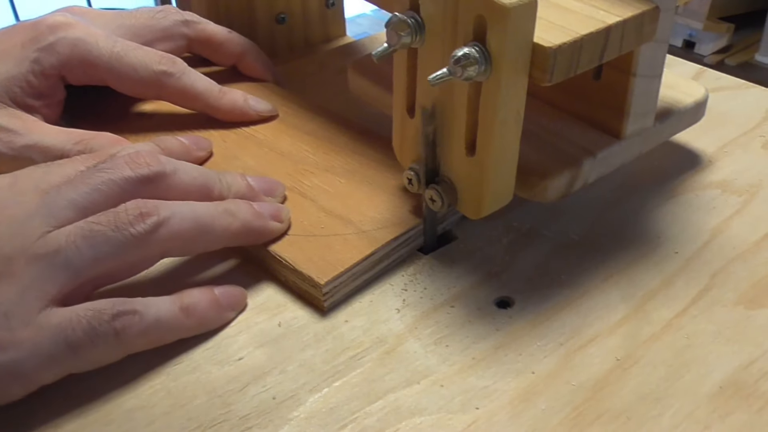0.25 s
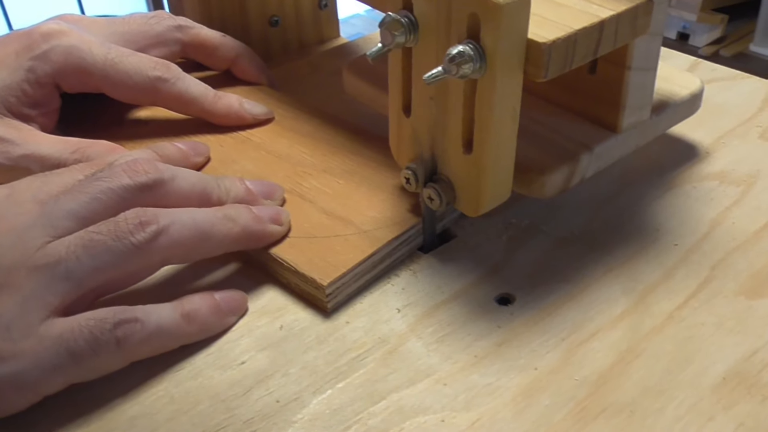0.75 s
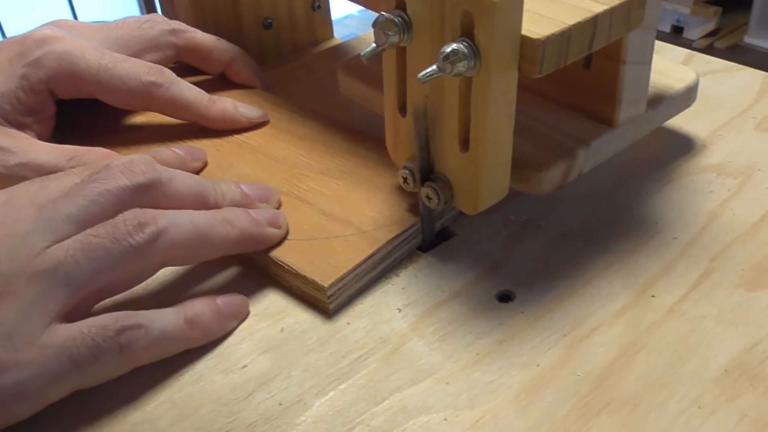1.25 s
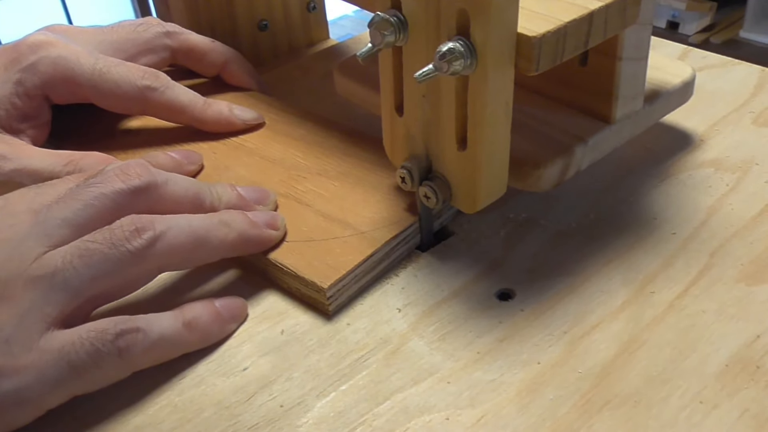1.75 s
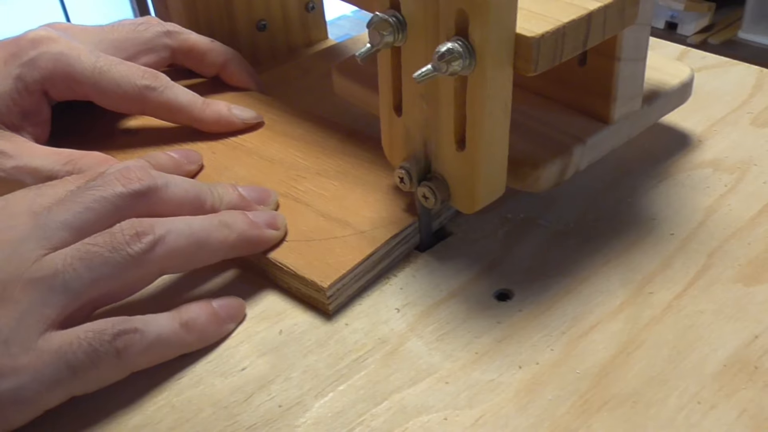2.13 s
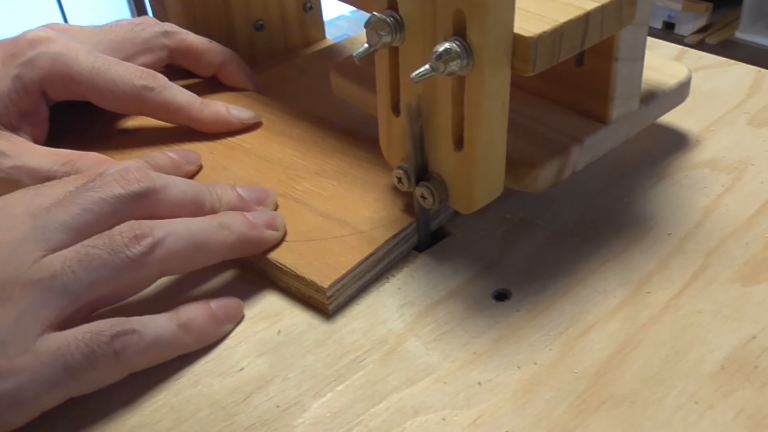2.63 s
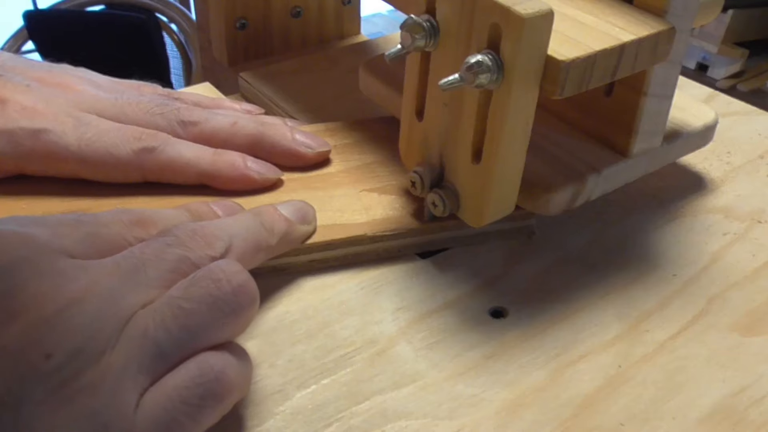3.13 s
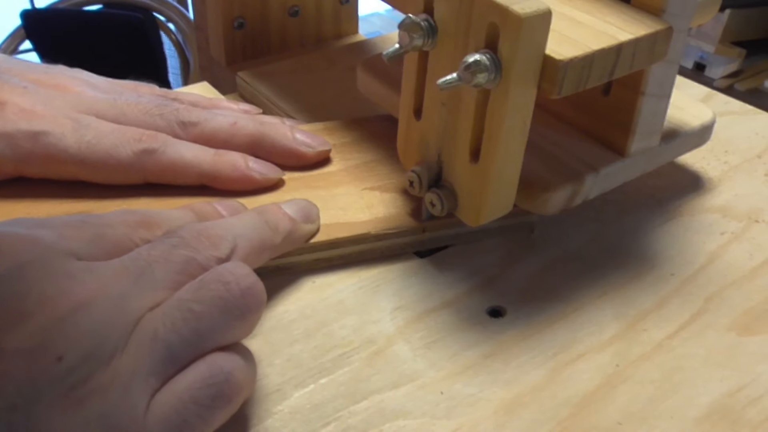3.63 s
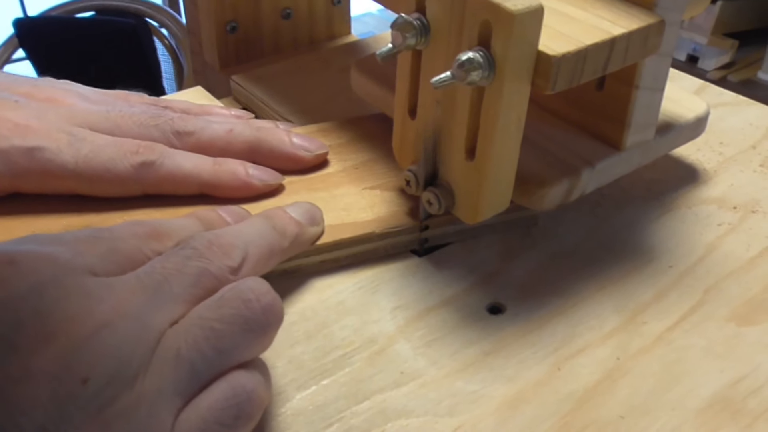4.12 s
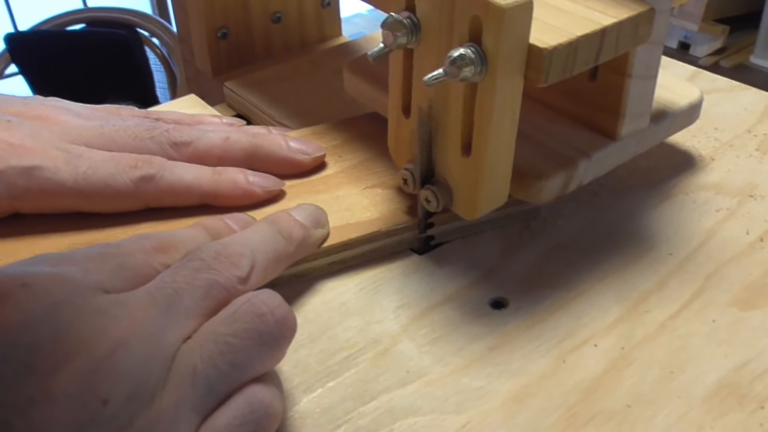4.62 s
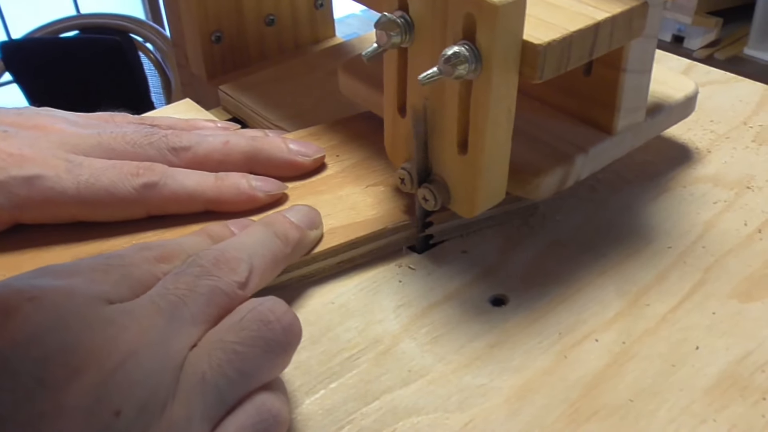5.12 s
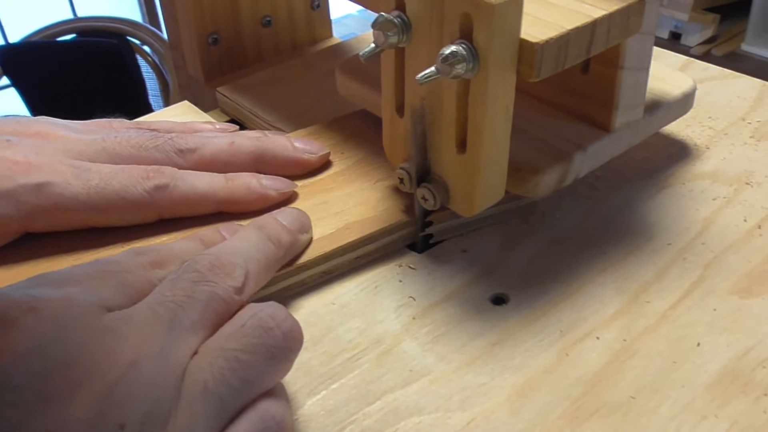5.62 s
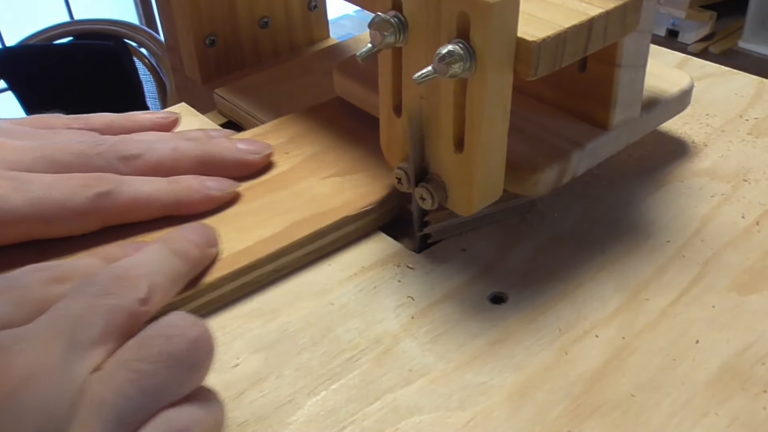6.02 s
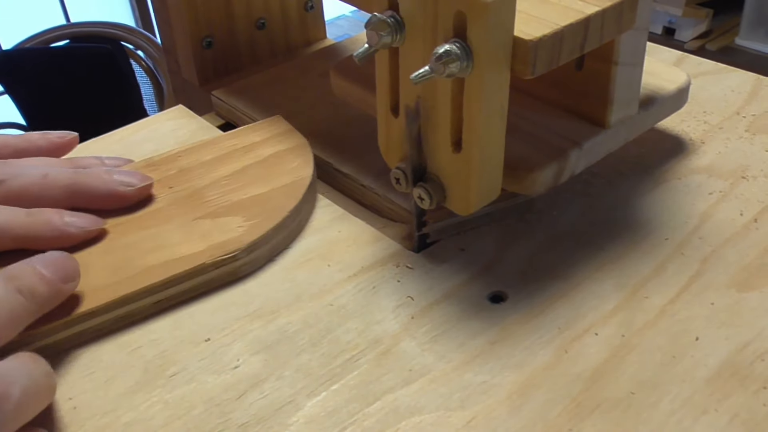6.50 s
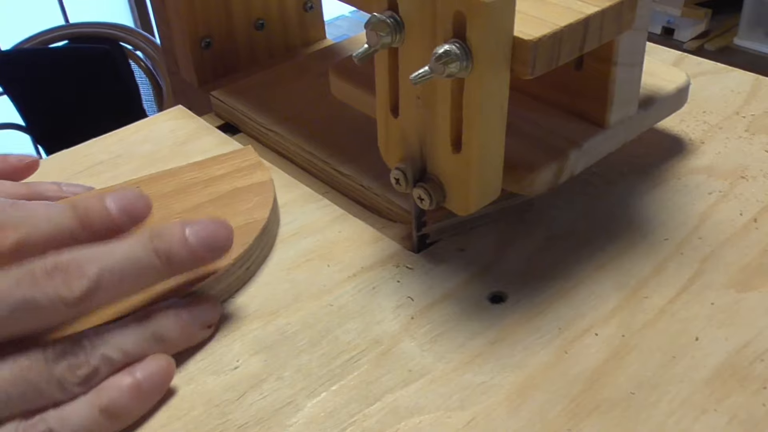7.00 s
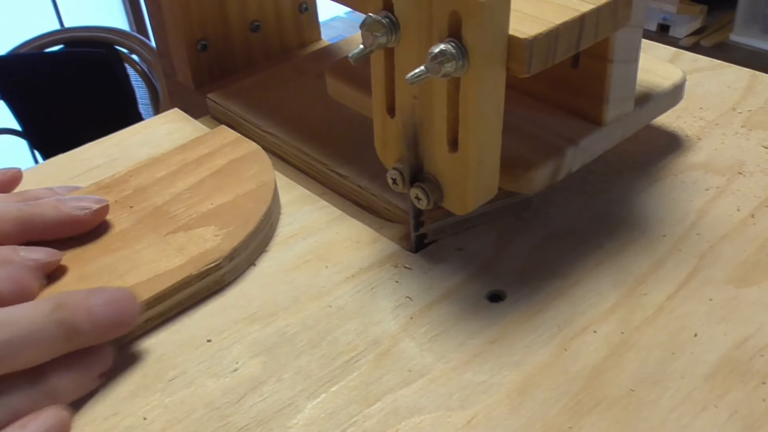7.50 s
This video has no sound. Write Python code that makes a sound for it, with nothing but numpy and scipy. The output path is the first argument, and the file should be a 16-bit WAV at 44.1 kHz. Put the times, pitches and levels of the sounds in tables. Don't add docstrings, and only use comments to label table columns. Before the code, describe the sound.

A jigsaw under a plywood table chatters steadily, jumps abruptly to a sped-up higher buzz, then drops back to the slower, looser rattle.

```python
import sys
import numpy as np
from scipy import signal
from scipy.fft import rfft, irfft
from scipy.io import wavfile
from scipy.ndimage import uniform_filter1d

SR = 44100
rng = np.random.default_rng(int(sys.argv[2]) if len(sys.argv) > 2 else 0)


def transcribe(signal):
    frames = np.atleast_2d(signal).T
    limited = np.clip(frames, -1, 1)
    pcm = np.round(limited * 32767).astype(np.int16)
    wavfile.write(sys.argv[1], SR, pcm)


def gain_from_db(level_db):
    decades = np.asarray(level_db, float) / 20
    return 10 ** decades


N = 341775


def ring(x, hz, width_hz):
    f = np.maximum(np.arange(x.shape[-1] // 2 + 1) * SR / x.shape[-1], 1)
    response = 1 / (1 + 1j * (f * f - hz * hz) / (f * width_hz)) ** 2
    y = irfft(rfft(x) * response, x.shape[-1])
    return y / np.sqrt(np.mean(y ** 2, axis=-1, keepdims=True))


def stereo(mid, side, side_gain):
    return mid + side_gain * side * np.array([[1], [-1]])


def random_swell(n, per_s, spread_db):
    k = max(int(SR / per_s), 2)
    steps = np.repeat(rng.standard_normal(n // k + 1), k)
    return spread_db * uniform_filter1d(steps, k)[:n]


RUMBLE_DB = [
    -83,
    -91.5,
    -79,
]
# t/s, peak/dB, loss either side/(dB/s)
BUMPS = [
    (0.0, -76, 130),
    (0.73, -91, 45),
    (1.92, -64, 45),
    (3.06, -73, 222),
    (5.2, -75, 302),
    (7.75, -81, 35),
]


def rumble():
    t = np.arange(N) / SR
    mid, side = ring(rng.standard_normal((2, N)), 123.0, 180.0)
    view = np.searchsorted([3.078, 5.169], t)
    shake = gain_from_db(np.array(RUMBLE_DB)[view] + random_swell(N, 4.1, 0.88))
    for at_s, peak_db, loss_db_per_s in BUMPS:
        shake = shake + gain_from_db(peak_db - loss_db_per_s * np.abs(t - at_s))
    return stereo(shake * mid, shake * side, 0.52) * gain_from_db([[-1.5], [1.5]])


def ticks(table, hz, width_hz, fall_s, trim_db):
    t = np.arange(N) / SR
    swell = 0
    for at_s, peak_db in table:
        rise = np.clip((t - at_s) / .0008, 0, 1)
        fall = np.exp(-np.maximum(t - at_s, 0) / fall_s)
        swell = swell + gain_from_db(peak_db + trim_db) * rise * fall
    mid, side = ring(rng.standard_normal((2, N)), hz, width_hz)
    return swell * stereo(mid, side, 0.5)


# t/s, peak/dB
NICKS = [(0.0653, -60), (0.164, -57), (1.48, -55), (1.5569, -58), (1.6332, -55), (1.7085, -56),
         (1.7833, -52), (1.8587, -52), (2.1685, -56), (2.2443, -57), (2.9322, -60), (3.0101, -54),
         (5.3946, -45), (6.3869, -57), (7.3257, -57)]


def nicks():
    return ticks(NICKS, 13400., 1500., fall_s=0.0017, trim_db=-2.0)


# t/s, peak/dB
RASPS = [
    (1.5718, -50),
    (1.6472, -45),
    (1.7175, -51),
    (1.7933, -46),
    (1.8687, -41),
    (1.9425, -40),
]


def rasps():
    return ticks(RASPS, 10900., 2200., fall_s=0.0047, trim_db=-6.0)


# t/s, peak/dB
GRAZE_LEVEL = [
    (5.2, -44.5),
    (5.39, -51),
    (5.53, -51),
    (5.62, -39),
    (5.67, -49),
    (5.71, -45),
]


def grazes():
    t = np.arange(N) / SR
    count, first_s, every_s, jitter_s = 15, 5.2075, 0.0355, 0.00096
    rise_s, fall_s = 0.0014, 0.024
    when = first_s + every_s * np.arange(count) + jitter_s * rng.standard_normal(count)
    peaks_db = np.interp(when, *np.transpose(GRAZE_LEVEL)) - 7.5
    swell = 0
    for at_s, peak_db in zip(when, peaks_db):
        rise = np.clip((t - at_s) / rise_s, 0, 1)
        fall = np.exp(-(np.maximum(t - at_s, 0) / fall_s) ** 2)
        swell = swell + gain_from_db(peak_db) * rise * fall
    mid, side = ring(rng.standard_normal((2, N)), 8900.0, 8100.0)
    dull = signal.butter(8, 13300., fs=SR, output="sos")
    return signal.sosfilt(dull, swell * stereo(mid, side, 0.8))


def gears(stroke, memory, size):
    memory = np.clip(memory, 0, .99)
    fresh = rng.standard_normal((int(np.ptp(stroke)) + 12, size))
    turns = signal.lfilter([1], [1, -memory], fresh, axis=0)[10:].ravel()
    return np.interp((stroke - stroke[0]) * size, np.arange(turns.size), turns)


def knocks(t, stroke, at, hz):
    slip_rad, scatter_db, detune = .15, 1.2, .002
    half = 2 * (stroke - at)
    turn = np.arange(np.floor(half[0]) - 1, half[-1] + 3)
    rate = np.ptp(half) / np.ptp(t)
    beyond = np.minimum(turn - half[0], 0) + np.maximum(turn - half[-1], 0)
    when = np.interp(turn, half, t) + beyond / rate
    slip, size, pitch = rng.standard_normal((len(turn), 3)).T
    up_down_phase = rng.random(2)[turn.astype(int) % 2]
    start = 2 * np.pi * up_down_phase + slip_rad * slip
    out = 0
    for step in (0, 1):
        k = (np.floor(half) + step - turn[0]).astype(int)
        fade = np.cos(np.pi / 2 * (half - turn[k]))
        ring_hz = hz * (1 + detune * pitch[k])
        wave = np.sin(2 * np.pi * ring_hz * (t - when[k]) + start[k])
        out = out + fade * gain_from_db(scatter_db * size[k]) * wave
    return out


def blows(t, stroke, unequal):
    even = np.interp(t, *np.transpose(unequal))
    out = 0
    for order in range(22, 60):
        level = (1 if order % 2 else even) * gain_from_db(random_swell(len(t), 4., 4))
        wander_rad = .75 * rng.standard_normal() + random_swell(len(t), 3., .4)
        out = out + level * np.cos(2 * np.pi * order * (stroke - .89) + wander_rad)
    return out


def clack(stroke, at):
    sharpness, scatter = 49.0, .12
    size = np.abs(1 + scatter * rng.standard_normal(int(np.ptp(stroke)) + 3))
    which = np.round(stroke - stroke[0] + stroke[0] % 1 - at + 1).astype(int)
    return size[which] * np.exp(sharpness * (np.cos(2 * np.pi * (stroke - at)) - 1))


# playing speed, stroke likeness/0-1, gear memory/0-1, gear share in table modes/0-1,
# loosening as the teeth bite less, lowest slapped mode f/Hz
PLAY = [
    (1, 1, .85, .25, 2, 800),
    (3, .92, .78, .35, 0, 800),
    (1, .7, .6, .4, 1, 340),
]
ANSWER = [
    (0.21, 0.63, 0.77, 0.93, 0.39),
    (-0.42, 0.62, -0.16, 0.26, 0.23),
    (0.24, -0.74, 0.97, 0.52, 0.95),
]
EDGES_HZ = (515, 1700, 5500, 9300)
EDGES_FAST_HZ = (460, 1560, 5100, 9300)
# true f/Hz, share/0-1
ALIKE = [(200, .93), (420, .93), (600, .8), (1100, .55), (1500, .45), (2200, .15), (5000, .02)]
# true f/Hz, side minus mid/dB, left minus right/dB
PAIR = [(60.6, -12, -1), (201, -16.5, -2), (465, -22.5, -1.5), (725, -7, -2.5), (1300, -14, 1.5),
        (2320, -8, 2.5), (4400, -5, -2), (8900, -3, 2.5), (13900, -4, -8)]


def jigsaw(view, crank, parts, timing, slide, odd, unequal, load, clack_at, clack_db, lean, thump_db):
    speed, alike, memory, geared, loosen, slap_hz = PLAY[view]
    edges_hz = EDGES_FAST_HZ if view == 1 else EDGES_HZ
    s, *controls = np.transpose(crank)
    first = round(s[0] * SR)
    t = np.arange(first, min(round(s[-1] * SR), N)) / SR
    n = len(t)
    stroke, lead, bite = (np.interp(t, s, c) for c in controls)
    span = int(.17 * SR)
    padded = np.pad(stroke, span, "reflect", reflect_type="odd")
    stroke = uniform_filter1d(padded, span)[span:-span]

    when, level_db, push_db = np.transpose(load)
    rattle = gears(stroke, memory, size=int(n / np.ptp(stroke) / 2))
    tearing_db = random_swell(n, 70 * speed, 1.36)
    slap_db = clack_db * bite * clack(stroke, clack_at)
    beats = blows(t, stroke, unequal) if unequal else None
    along = (t - t.mean()) / np.ptp(t)
    odd_db = sum(db * np.exp(-((t - at) * speed / 0.012) ** 2) for at, db in odd)
    alike_hz, alike_share = np.transpose(ALIKE)
    pair_hz, *pair_db = np.transpose(PAIR)

    out = np.zeros((2, n))
    for part, (_, once_at, twice_at), slide_db in zip(parts, timing, slide):
        hz, width_hz, db, once_db, twice_db = part
        true_hz = hz / speed
        main_mode = abs(true_hz / 420 - 1) < .1
        same = np.clip(alike * np.interp(np.log(true_hz), np.log(alike_hz), alike_share), 0, 1)
        side_db, pan_db = (np.interp(np.log(true_hz), np.log(pair_hz), c) for c in pair_db)

        if unequal and 330 < true_hz < 700:
            knock = beats
        else:
            knock = knocks(t, stroke, twice_at, hz)
        sources = np.array([knock, rattle, *rng.standard_normal((2, n))])
        knock, tied, mid, side = ring(sources, hz, width_hz)
        if true_hz < 700:
            tied = np.sqrt(1 - geared) * knock + np.sqrt(geared) * tied
        same = same * np.clip(bite, 0, 1) ** loosen
        mid = np.sqrt(same) * tied + np.sqrt(1 - same) * mid

        once = np.cos(2 * np.pi * (stroke - once_at))
        angle = 4 * np.pi * (stroke - twice_at)
        twice = np.cos(angle) + lean * np.sin(2 * angle)
        if main_mode:
            once_db = once_db * lead
        swell_db = once_db * once + twice_db * bite * twice
        if main_mode:
            swell_db = swell_db + thump_db * lead * np.exp(9.0 * (once - 1))
        if true_hz > 900:
            swell_db = swell_db + tearing_db
        if slap_hz < true_hz < 5000:
            swell_db = swell_db + slap_db
        swell = gain_from_db(swell_db)
        swell = swell / np.sqrt(np.mean(swell ** 2))

        load_db = level_db + ANSWER[view][np.searchsorted(edges_hz, hz)] * push_db
        gain_db = db + np.interp(t, when, load_db) + slide_db * along
        if true_hz < 1700:
            gain_db = gain_db + odd_db
        pan = gain_from_db(np.array([[pan_db], [-pan_db]]) / 2)
        out += swell * gain_from_db(gain_db) * stereo(mid, side, gain_from_db(side_db)) * pan

    out = signal.sosfilt(signal.butter(2, 86.0 * speed, "high", fs=SR, output="sos"), out)
    top_hz = min(14600.0 * speed, .45 * SR)
    out = signal.sosfilt(signal.butter(8, top_hz, fs=SR, output="sos"), out)
    out *= np.clip(np.minimum(t - s[0] + (s[0] == 0), s[-1] - t) / 0.00012, 0, 1)
    return np.pad(out, ((0, 0), (first, N - first - n)))


# t/s, strokes done, lead of upstroke knock, bite of both knocks
CRANK_START = [(0.0, 0.517, 0.2, 1.1), (0.512, 7.25, 1.7, 1.2), (0.853, 11.66, 2.1, 1.1),
               (1.364, 18.2, 1.4, 1.0), (1.41, 18.8, -0.2, 0.6), (1.706, 22.65, -0.2, 0.6),
               (1.99, 26.464, -0.5, 0.8), (2.047, 27.23, 1.0, 1.0), (2.388, 31.72, 1.1, 1.2),
               (2.729, 36.12, 1.4, 1.1), (3.078, 40.534, 1.4, 0.8)]
# f/Hz, width/Hz, level/dB, swell once a stroke/dB, swell twice a stroke/dB
PARTS_START = [(130, 100, -72.5, 1, -16), (193.6, 78, -56.5, 3, 4), (289.4, 300, -60, 8, 2),
               (419.2, 121, -42.5, 1.75, 4), (611.8, 130, -48.5, 3.5, 2), (700, 205, -60, -3.5, 8),
               (873.4, 58, -55.5, 3.5, 1), (1115, 317, -49.5, 0, 2), (1380, 148, -57, 1, 3),
               (2115, 690, -61, 0.5, 1.5), (2800, 420, -70, 0.5, 0), (3416, 580, -63.5, 2, 2),
               (4400, 2100, -67, 0, 0.5), (6770, 1150, -67, 1.5, 3), (7870, 3000, -64, 1.2, 2.5),
               (10190, 470, -62.5, 2.5, 4), (11440, 890, -66, 2, 3), (13300, 2700, -74.5, 1.9, 1)]
# f/Hz, once at/stroke, twice at/stroke
TIMING_START = [(125, 0.32, 0.24), (194, 0.38, 0.23), (295, 0.89, 0.3), (420, 0.99, 0.0), (610, 0.6, 0.06),
                (740, 0.67, 0.17), (880, 0.59, 0.02), (1100, 0.2, 0.0), (1400, 0.1, 0.02),
                (2120, 0.15, 0.48), (2800, 0.1, 0.48), (3400, 0.07, 0.49), (4600, 0.03, 0.48),
                (6900, 0.98, 0.45), (8400, 0.02, 0.46), (10300, 0.01, 0.45), (11600, 0.99, 0.45),
                (13300, 0.89, 0.44)]
SLIDE_START = [0.1, 0.1, 0.1, 0.074, 0.1, 0.1, 0.1, 0.1, 0.1, 0.1, 0.1, 0.1, 0.1, 0.1, 0.1, 0.1, 0.1, 0.1]
# t/s, gain/dB
ODD_START = [(0.038, 4.5), (0.08, -1.5), (0.114, 3.6), (0.192, 3), (0.231, -2.5), (0.268, 3.5), (0.3, -2),
             (0.342, 0), (0.383, -2.5), (0.418, -1.5), (0.459, -0.5), (0.496, 2), (0.532, 1.5),
             (0.612, -2.5), (0.652, 2), (0.687, -2.5), (0.728, -2), (0.802, -0.5), (0.921, -1.5),
             (0.955, -0.5), (1.037, -1), (1.114, 3), (1.151, 0.5), (1.191, 1), (1.229, 2.2), (1.274, -1),
             (1.35, 0.5), (1.386, 0), (1.426, 0), (1.467, -3), (1.505, -0.5), (1.61, -2.5), (1.729, -2.5),
             (1.775, 0.3), (1.8, -5), (1.828, 2), (1.882, -5.5), (1.917, -3), (1.958, -1), (1.99, 3),
             (2.067, 1.5), (2.144, 0.5), (2.184, -1), (2.257, 1.5), (2.333, -0.5), (2.411, 0.3), (2.448, 1),
             (2.602, -2.5), (2.685, -1.9), (2.72, 1), (2.842, -0.5), (2.921, 1.5), (2.959, -0.5),
             (2.999, -1.5), (3.031, -3.5)]
# t/s, level/dB, push of board on teeth/dB
LOAD_START = [
    (0.0, 1, -1.6),
    (1.35, 1.5, -1.7),
    (1.5, -4, 4),
    (1.95, 1.5, 5),
    (2.1, 5, -2.5),
    (2.45, -0.4, 1.5),
    (2.88, 0.85, 0.3),
    (2.99, -1.5, -1),
    (3.078, -12, 12.5),
]


def saw_start():
    return jigsaw(0, CRANK_START, PARTS_START, TIMING_START, SLIDE_START, ODD_START, None, LOAD_START,
                  clack_at=0.07, clack_db=4.5, lean=0.6, thump_db=0.5)


CRANK_FAST = [
    (3.078, 0.342, 1.4, 1.3),
    (3.6, 20.03, 0.9, 1.2),
    (3.947, 33.37, -0.1, 1.1),
    (4.293, 46.77, 0.0, 1.0),
    (4.467, 53.55, 0.4, 0.9),
    (4.64, 60.49, 0.9, 0.7),
    (4.813, 67.55, 0.5, 0.7),
    (5.164, 81.913, 0.2, 0.7),
]
PARTS_FAST = [(322, 140, -71, 0.89, 0.66), (381, 27, -65, 0.89, 0.89), (442, 22, -67.5, 0.5, 0.44),
              (537.5, 104, -63.5, 0.53, 0.82), (588, 138, -59, 1.3, 0.69), (630, 147, -61.5, 0.48, 0.4),
              (874, 430, -69.5, 0.8, 0.91), (1239, 163, -50, 0.2, 0.71), (1297, 307, -46, 0.72, 1.6),
              (1340, 840, -62, 1.3, 0.52), (1825, 200, -47, 0.63, 1.1), (2505, 230, -56.5, 2.6, 3.1),
              (2920, 160, -63, 3.5, 2.8), (3274, 880, -50, 0.42, 3), (3950, 360, -51.5, 1.9, 3.7),
              (4204, 400, -50, 3, 4.8), (6660, 1600, -64.5, 0.71, 1.5), (8000, 1800, -67, 0.32, 1.2),
              (10000, 2100, -65.5, 0.74, 2), (11800, 2200, -68.5, 0.6, 1.8), (14500, 2600, -67.5, 0.4, 1.9)]
TIMING_FAST = [(260, 0, 0.2), (385, 0.31, 0.48), (455, 0.31, 0.48), (520, 0.95, 0.27), (580, 0.95, 0.27),
               (680, 0.84, 0.45), (880, 0.18, 0.17), (1170, 0.98, 0.42), (1300, 0.98, 0.42),
               (1530, 0.94, 0.32), (1840, 0.01, 0.48), (2350, 0.4, 0.41), (2900, 0.84, 0.43),
               (3350, 0.29, 0.43), (3900, 0.95, 0.43), (4250, 0.95, 0.43), (6900, 0.32, 0.42),
               (8400, 0.61, 0.43), (10000, 0.16, 0.44), (12000, 0.38, 0.45), (14300, 0.87, 0.43)]
SLIDE_FAST = [6, -3.5, 11.5, 13, -4.5, 3.5, -4, -2, -2.5, 1, -0.3, -2, 4, -0.5, 0, -3, 1.5, -2, 1.5, 1, 3]
# t/s, inequality/0-1
UNEQUAL = [
    (3.08, 0.9),
    (3.5, 0.6),
    (3.75, 0.98),
    (4.0, 0.66),
    (4.3, 0.53),
    (4.6, 0.97),
    (5.16, 0.97),
]
LOAD_FAST = [
    (3.079, -0.031, -5.5),
    (3.23, -0.25, -1.5),
    (3.67, -0.91, -1.5),
    (4.42, -0.18, 1.5),
    (4.57, 0.5, 2.5),
    (4.72, 0.91, 1.6),
    (4.865, 0.71, 5.5),
    (5.01, 0.083, -0.1),
    (5.163, 0.58, 1),
]


def saw_fast():
    return jigsaw(1, CRANK_FAST, PARTS_FAST, TIMING_FAST, SLIDE_FAST, [], UNEQUAL, LOAD_FAST,
                  clack_at=1.0, clack_db=2.0, lean=0.082, thump_db=-1.8)


CRANK_END = [
    (5.169, -0.345, 2.7, 0.7),
    (5.514, 4.73, 1.2, 0.9),
    (5.772, 8.42, -0.4, 0.9),
    (6.03, 12.15, 1.2, 0.9),
    (6.374, 17.16, 1.8, 1.2),
    (6.89, 24.78, 0.4, 1.1),
    (7.234, 29.9, 1.7, 1.1),
    (7.75, 37.54, -0.5, 1.0),
]
PARTS_END = [(135.5, 38, -65, 1.2, 0.64), (188, 97, -57, 1.6, 0.45), (302, 66, -57.5, 1.5, 0.84),
             (372.5, 32, -50, 2.5, 7.1), (420, 86, -47, 0.22, 1.3), (474, 17, -54, 0.65, 0.5),
             (612, 97, -45.5, 1.1, 0.25), (661, 400, -50.5, 0.43, 5.2), (865, 320, -54.5, 3.4, 0.96),
             (1125, 203, -50, 1.3, 0.62), (1396, 200, -53, 0.42, 0.61), (2243, 460, -61, 0.9, 0.94),
             (2750, 640, -64, 0.38, 0.36), (3470, 840, -62, 2.6, 2.2), (4520, 2100, -64.5, 0.11, 0.29),
             (6600, 1100, -64.5, 0.38, 1.8), (8050, 2500, -63, 0.2, 1.4), (10060, 1700, -69.5, 0.2, 1.1),
             (11400, 1800, -64, 1.2, 4.4), (13300, 4300, -72.5, 1.1, 2.1)]
TIMING_END = [(125, 0.78, 0.22), (185, 0.15, 0.21), (295, 0.91, 0.4), (360, 0.83, 0.36), (420, 0.95, 0.35),
              (500, 0.74, 0.34), (603, 0.84, 0.4), (740, 0.76, 0.35), (870, 0.99, 0.39), (1140, 0.93, 0.39),
              (1400, 0.01, 0.4), (2220, 0.78, 0.06), (2900, 0.85, 0.5), (3500, 0.72, 0.04),
              (4600, 0.73, 0.02), (6500, 0.35, 0.02), (7900, 0.36, 0.49), (9800, 0.66, 0.49),
              (11500, 0.54, 0.5), (13300, 0.45, 0.5)]
SLIDE_END = [0.1, 0.1, 0.1, 0.1, 0.1, 0.1, 0.1, 3, 0.1, 0.1, 0.1, 0.1, 0.15, 0.1, 0.1, 0.1, 0.1, 0.1, 0.1,
             0.14]
ODD_END = [(5.254, 0), (5.347, -1), (5.388, 2), (5.422, -3), (5.456, -4.5), (5.594, -0.5), (5.63, 4),
           (5.701, 0), (5.734, 1), (5.772, -0.5), (5.804, -0.5), (5.836, 2.5), (5.871, 2.5), (5.9, 1.7),
           (5.94, 0.5), (6.009, 5.5), (6.08, 0.5), (6.111, -2.5), (6.147, 1.5), (6.185, 0), (6.212, 3),
           (6.246, 2), (6.286, 0.5), (6.322, 0.5), (6.349, 1.5), (6.374, 1.5), (6.42, 2), (6.486, 1.5),
           (6.522, 0.5), (6.588, 0), (6.626, 4.5), (6.692, -0.5), (6.729, -1), (6.761, -1.5), (6.794, 3.5),
           (6.825, 0.7), (6.886, -2.7), (6.929, 1.5), (6.963, -1.5), (6.995, -2), (7.06, 0.5), (7.099, -1),
           (7.164, -2), (7.198, -1.5), (7.231, 0.9), (7.268, 0), (7.301, -0.5), (7.367, -1.6), (7.402, 0.5),
           (7.434, 0), (7.505, 1), (7.539, -1.5), (7.566, 2), (7.604, -1), (7.639, -1.5)]
LOAD_END = [
    (5.17, -3.5, 1.7),
    (5.35, 0.8, 0.5),
    (5.65, 1, 0.75),
    (5.71, 1, 1.1),
    (5.73, 0, -0.75),
    (5.85, -0.4, 0.7),
    (6.42, 0.8, -0.12),
    (6.8, 1, -0.52),
    (7.75, 1.5, -1.3),
]


def saw_end():
    return jigsaw(2, CRANK_END, PARTS_END, TIMING_END, SLIDE_END, ODD_END, None, LOAD_END,
                  clack_at=0.856, clack_db=2.0, lean=0.043, thump_db=1.0)


def scene():
    background = rumble()
    contacts = nicks() + rasps() + grazes()
    saw = saw_start() + saw_fast() + saw_end()
    return background + contacts + saw


def band_limit(x):
    return signal.sosfilt(signal.butter(12, 15750, fs=SR, output="sos"), x)


def record(dry):
    return band_limit(dry)


dry = scene()
out = record(dry)
transcribe(out)
```